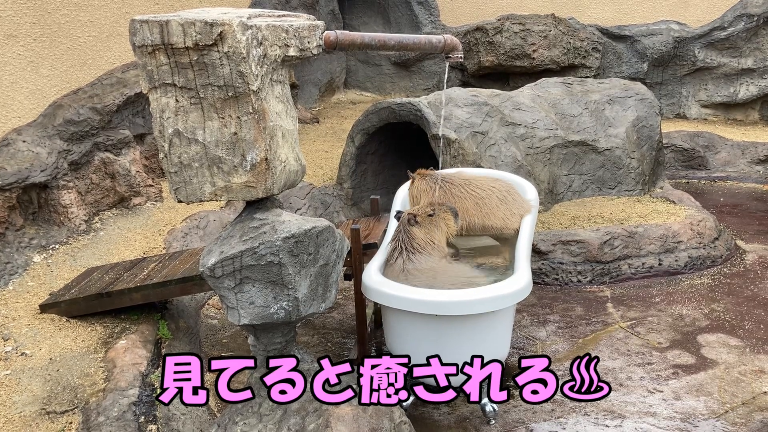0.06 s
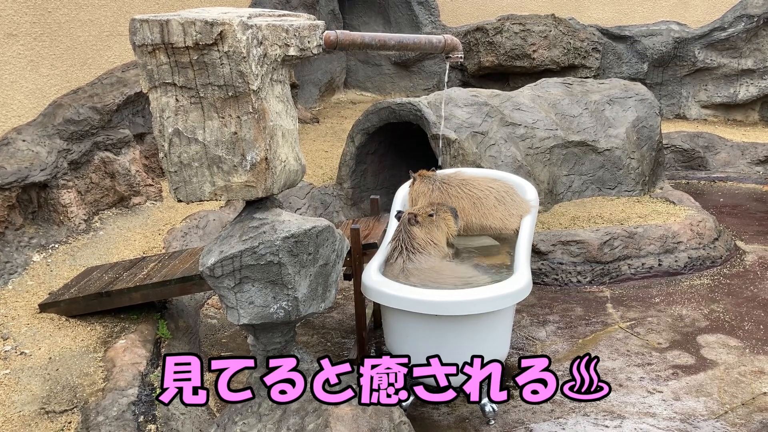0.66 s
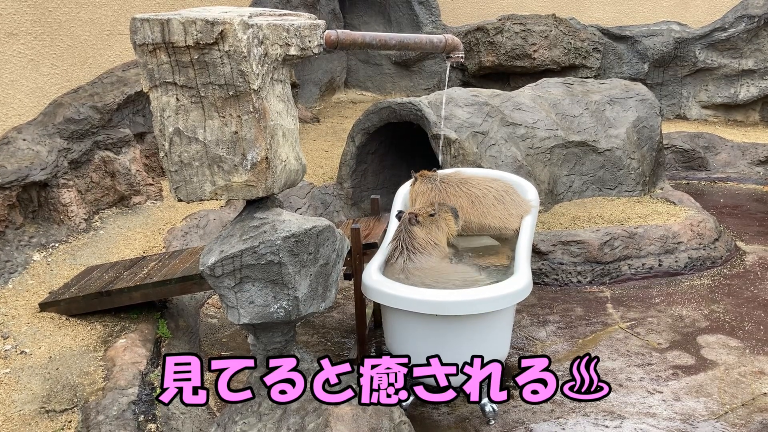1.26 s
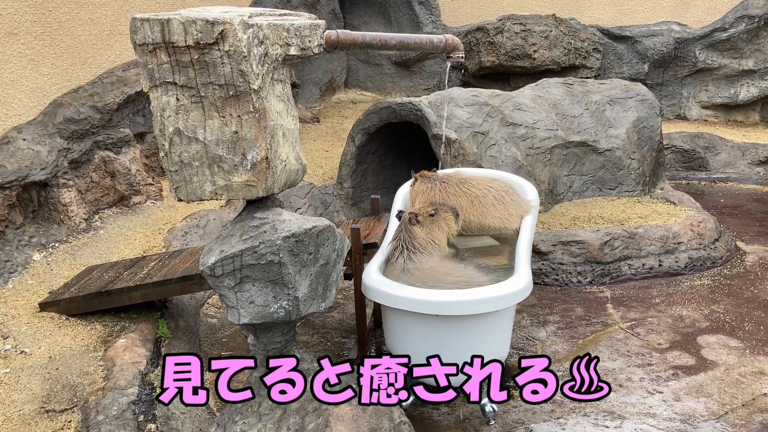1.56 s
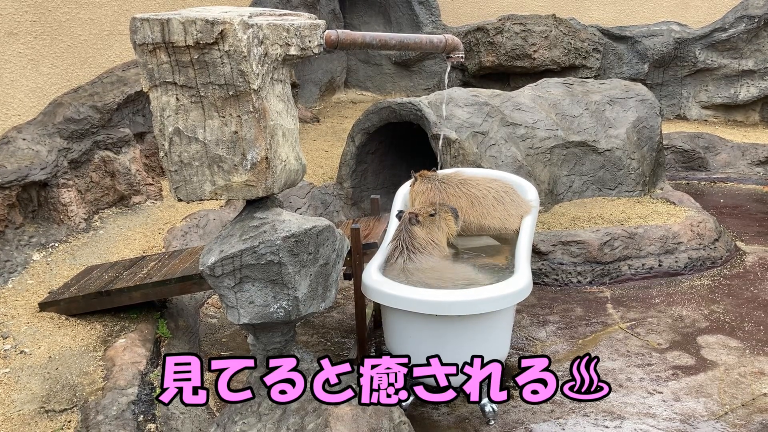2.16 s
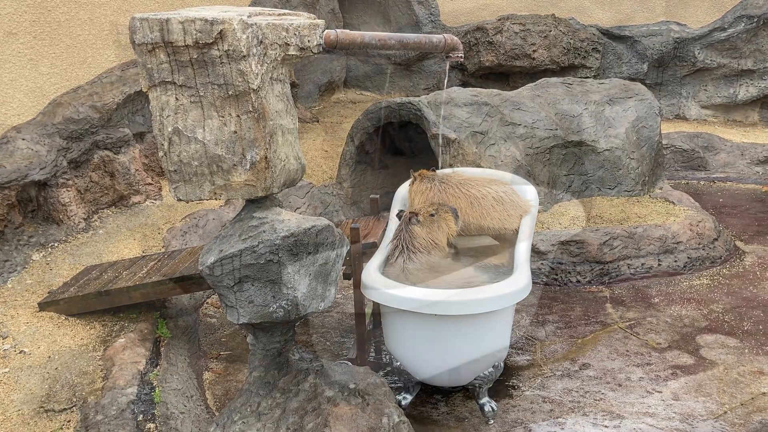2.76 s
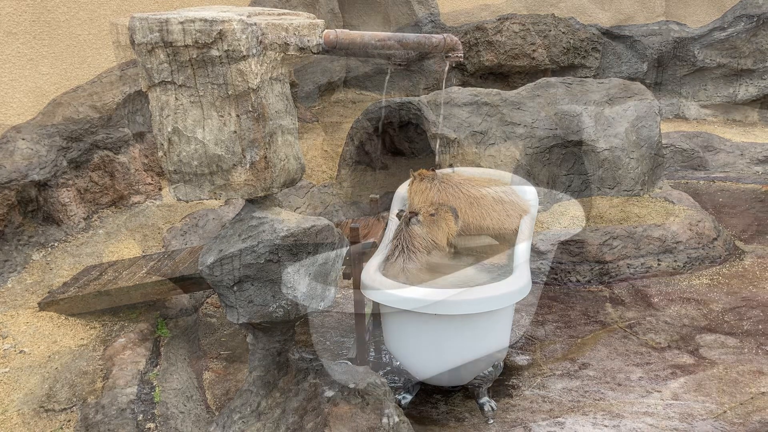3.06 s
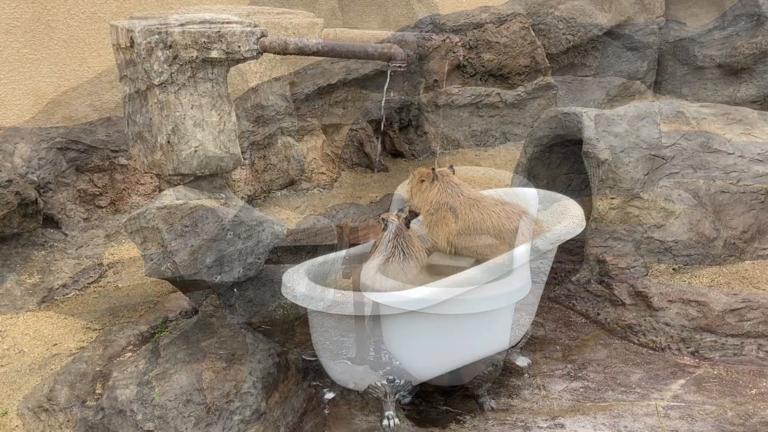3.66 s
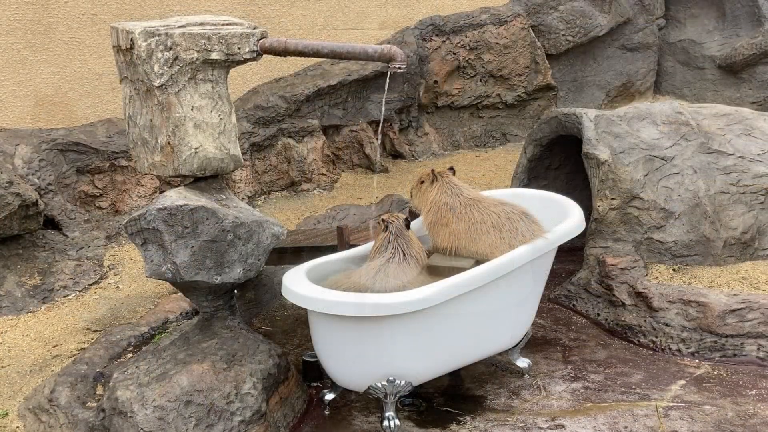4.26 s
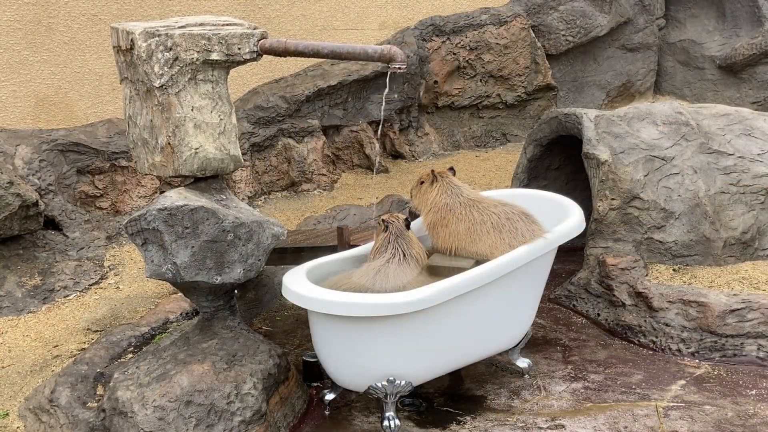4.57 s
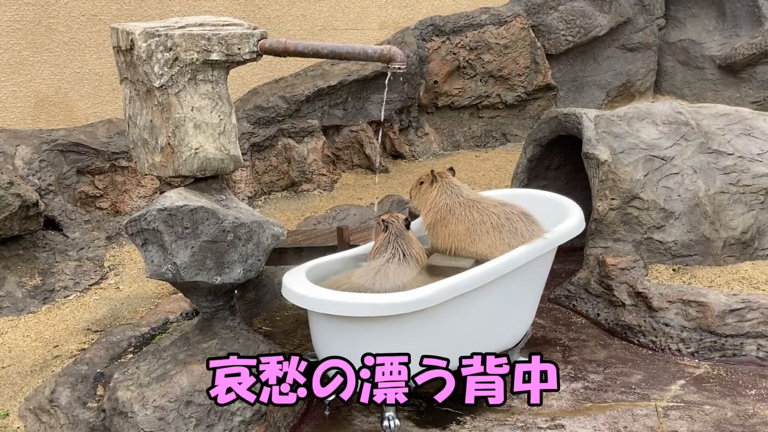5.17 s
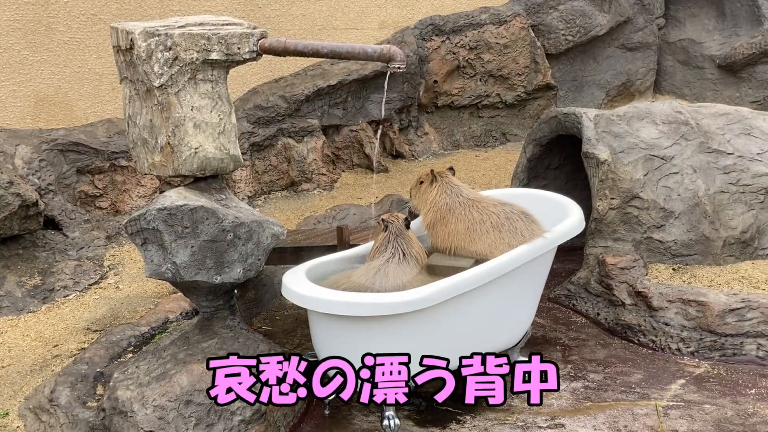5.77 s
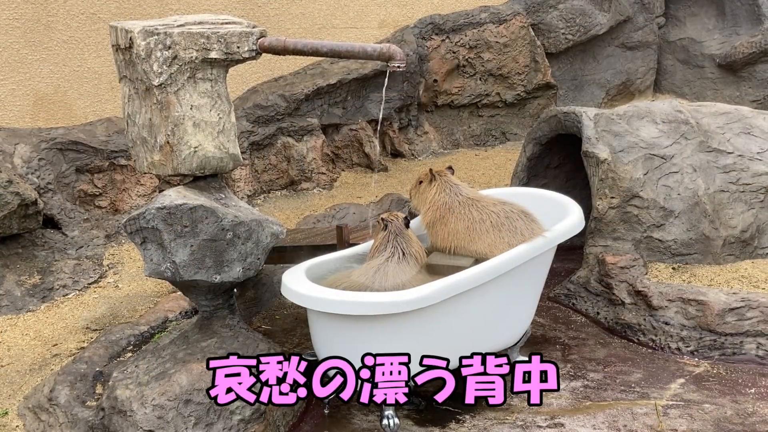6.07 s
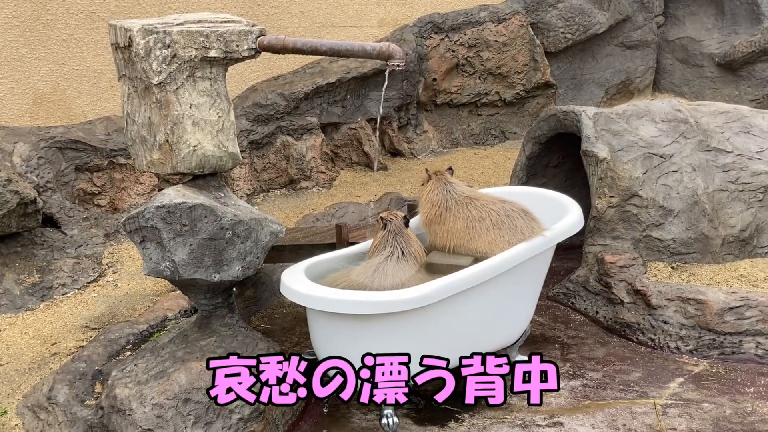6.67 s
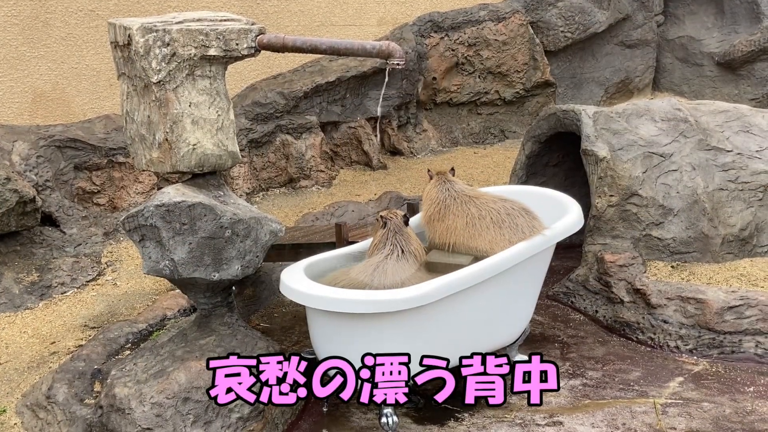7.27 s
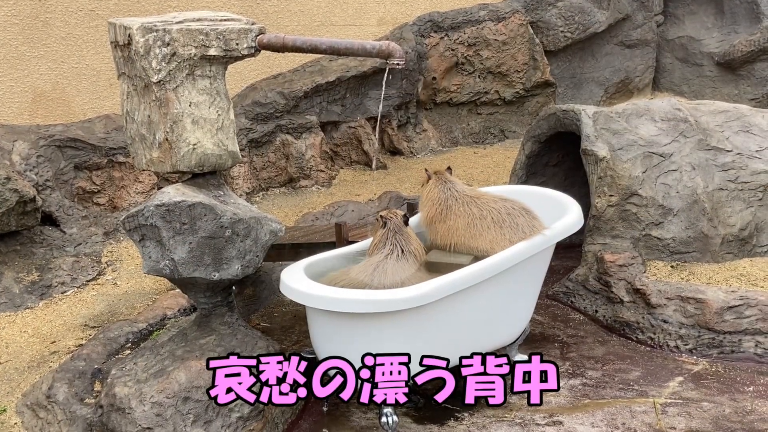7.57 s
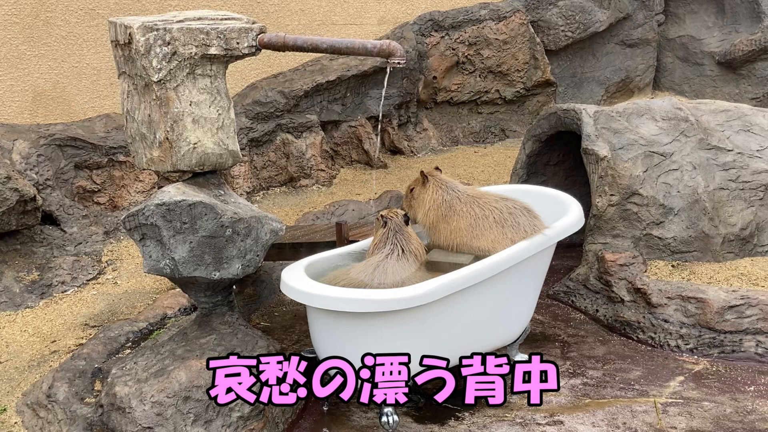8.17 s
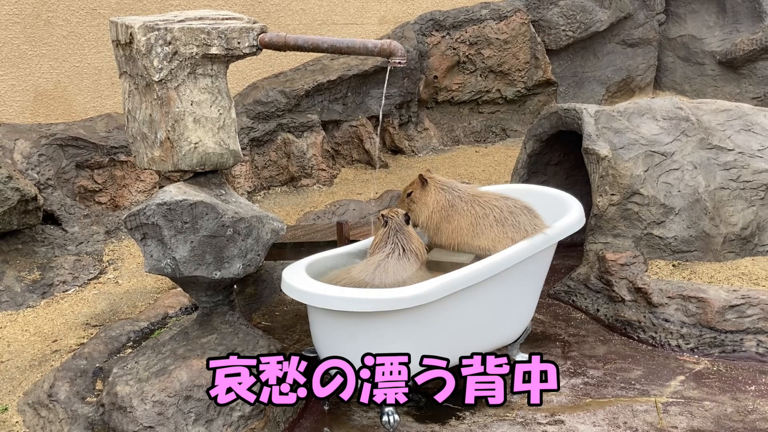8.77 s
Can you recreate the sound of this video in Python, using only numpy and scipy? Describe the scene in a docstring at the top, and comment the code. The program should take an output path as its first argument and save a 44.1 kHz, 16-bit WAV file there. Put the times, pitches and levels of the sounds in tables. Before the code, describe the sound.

A thin stream of water pours from a pipe into a full bathtub for about nine seconds, trickling and bubbling from the very start. Irregular plops and plinks, many rising in pitch, ring out over a dense babble of smaller bubbles. Fine spray fizzes and ticks on the surface, with occasional sharper droplets. Around 2 seconds, and again just before 4, the stream breaks up into brief, brighter splashes, with smaller sloshes between 5 and 6 seconds. Just before 7 seconds it runs smoother and quieter for an instant, then comes one sharp drip, the loudest moment. A couple of quick splashes follow before 8 seconds, and the bubbling carries on evenly to the end. The sound is light, with little bass, and the spray spreads wide in stereo. The tub wall and outdoor rocks return short, faint echoes, over a barely audible hush of air.

```python
"""A thin stream falls from a pipe into a full bathtub in a rocky outdoor enclosure.
From the start it drags air under: big bubbles ring, many rising in pitch as they float up, over a
babble of small ones. Spray ticks on the water, and the tub wall and rocks throw back short echoes.
Around 2 s and again near 4 s the stream breaks up and sloshes. Just before 7 s it briefly runs smooth,
then comes the loudest drip, and the bubbling carries on to the end, near 9 s."""
import sys
import numpy as np
from scipy import signal
from scipy.fft import rfft, irfft, next_fast_len
from scipy.io import wavfile
from scipy.ndimage import uniform_filter1d

SR = 44100
rng = np.random.default_rng(int(sys.argv[2]) if len(sys.argv) > 2 else 0)


def dump_mix(stems):
    """Bounce the given channels to the path in sys.argv[1] as a 16-bit WAV at rate SR."""
    frames = np.atleast_2d(stems).T  # one column per channel
    limited = np.clip(frames, -1, 1)  # hard clip at full scale
    pcm = np.round(limited * 32767).astype(np.int16)
    wavfile.write(sys.argv[1], SR, pcm)


N = 392931


# The loud bubbles: (time [s], starting pitch [Hz], level [dB], ring time [s],
# rise in one ring time [share of the pitch])
LOUD_BUBBLES = [(0.151, 576, -33, 0.045, 0.49), (0.289, 1050, -17, 0.0053, -0.069),
                (0.301, 1110, -27, 0.024, -0.066), (0.34, 400, -31, 0.011, 0.19),
                (0.405, 2180, -13.5, 0.0024, -0.22), (0.411, 604, -15.5, 0.012, 0.85),
                (0.452, 913, -28, 0.04, 0.12), (0.628, 1030, -19, 0.011, 0.18),
                (0.657, 720, -29, 0.0073, -0.27), (0.736, 710, -36, 0.046, 1.16),
                (0.739, 3000, -9, 0.00087, -0.14), (0.74, 1100, -21, 0.004, 0),
                (0.945, 2900, -13, 0.00084, 0.08), (0.946, 1222, -6.5, 0.0093, -0.12),
                (0.96, 1180, -21, 0.0065, -0.2), (0.996, 640, -29, 0.015, -0.061),
                (1.052, 1540, -27, 0.012, 0.28), (1.073, 1252, -22, 0.014, -0.12),
                (1.244, 1320, -23, 0.008, -0.16), (1.257, 2180, -23.5, 0.0056, -0.033),
                (1.306, 438, -41, 0.06, 0.56), (1.425, 1570, -21.5, 0.005, -0.0051),
                (1.455, 1536, -28, 0.016, 0.041), (1.528, 2410, -19, 0.0025, -0.04),
                (1.62, 743, -30.5, 0.047, 0.66), (1.739, 1260, -21.5, 0.013, 0.036),
                (1.801, 3200, -14, 0.0012, -0.024), (1.803, 778, -27.5, 0.023, 0.47),
                (1.861, 1230, -19, 0.0056, 0.028), (1.877, 705, -28, 0.035, 0.33),
                (1.912, 672, -32.5, 0.034, 0.13), (1.955, 700, -26.5, 0.021, 0.13),
                (2.007, 1310, -16.5, 0.0089, -0.07), (2.034, 1086, -26, 0.048, 0.088),
                (2.079, 1010, -21.5, 0.01, -0.0013), (2.183, 1857, -25.5, 0.014, 0.05),
                (2.21, 766, -27.5, 0.026, 0.15), (2.324, 466, -27.0, 0.038, 0.27),
                (2.347, 1860, -17, 0.0051, -0.1), (2.382, 815, -18, 0.027, 0.091),
                (2.384, 970, -12, 0.0033, 0.16), (2.425, 1010, -26.5, 0.04, -0.23),
                (2.451, 2560, -17.5, 0.0039, 0.036), (2.464, 1016, -21, 0.015, 0.48),
                (2.532, 1980, -26, 0.006, 0.085), (2.603, 862, -28.5, 0.029, 0.32),
                (2.809, 992, -22, 0.02, 0.075), (2.817, 1960, -21.5, 0.011, -0.0099),
                (2.839, 1620, -18, 0.0058, -0.02), (2.939, 783, -26, 0.017, 0.18),
                (2.975, 1510, -22, 0.009, 0.02), (3.029, 1980, -16, 0.0042, 0.08),
                (3.03, 1180, -27, 0.017, -0.022), (3.143, 2350, -20, 0.002, -0.45),
                (3.211, 1177, -22, 0.012, -0.15), (3.348, 1980, -25, 0.013, -0.14),
                (3.424, 1870, -19.5, 0.0062, 0.15), (3.46, 460, -39, 0.028, 0.27),
                (3.468, 793, -26.5, 0.0099, 0.1), (3.538, 1050, -25, 0.017, 0.15),
                (3.566, 607, -18.5, 0.0073, -0.12), (3.575, 475, -31, 0.043, 0.1),
                (3.614, 544, -32.5, 0.043, 0.88), (3.706, 3060, -23.5, 0.0045, -0.052),
                (3.72, 780, -28.5, 0.02, -0.097), (3.723, 1620, -23, 0.0061, 0.06),
                (3.762, 665, -26.5, 0.045, 0.85), (3.829, 2885, -19.5, 0.0074, -0.1),
                (3.833, 982, -25, 0.012, 0.17), (3.838, 1910, -24.0, 0.009, 0.08),
                (3.876, 3030, -10, 0.004, -0.068), (3.887, 2070, -15.0, 0.0014, 0.01),
                (3.889, 2880, -24, 0.01, 0.0091), (3.91, 1007, -23.5, 0.02, -0.05),
                (3.918, 1815, -22.5, 0.011, 0.01), (3.955, 617, -38, 0.025, 0.35),
                (3.98, 1160, -18.5, 0.004, 0.22), (4.016, 1705, -18, 0.0069, -0.048),
                (4.077, 2190, -20.5, 0.0052, -0.53), (4.163, 612, -27, 0.016, 0.1),
                (4.166, 876, -25, 0.055, 0.25), (4.169, 402, -32, 0.0051, 0.03),
                (4.358, 1450, -17, 0.0044, -0.33), (4.423, 748, -28, 0.017, 0.13),
                (4.426, 1400, -19.5, 0.0074, -0.0068), (4.502, 887, -18, 0.013, -0.012),
                (4.597, 1030, -27, 0.018, -0.039), (4.656, 617, -30, 0.028, 0.086),
                (4.726, 738, -27.5, 0.031, 0.39), (4.757, 1380, -27.5, 0.024, 0.13),
                (4.811, 2670, -21.5, 0.0041, -0.027), (4.861, 570, -33, 0.03, 0.18),
                (4.951, 1310, -15, 0.0076, -0.17), (4.998, 795, -20, 0.023, 0.24),
                (5.012, 647, -20, 0.023, 0.069), (5.112, 515, -38, 0.051, 0.37),
                (5.243, 1120, -23.5, 0.018, -0.17), (5.259, 561, -31, 0.037, 0.33),
                (5.277, 1800, -38, 0.0077, 0.023), (5.322, 1224, -29, 0.02, 0.77),
                (5.395, 2400, -19, 0.002, -0.16), (5.406, 408, -40.5, 0.074, 0.41),
                (5.435, 641, -34, 0.034, 0.14), (5.504, 1450, -15, 0.0046, 0.028),
                (5.545, 2530, -22, 0.0029, 0.15), (5.565, 936, -24.5, 0.0096, -0.29),
                (5.636, 1043, -22, 0.0094, -0.01), (5.796, 2400, -16, 0.0018, -0.24),
                (5.886, 840, -26, 0.014, 0.24), (5.89, 542, -22.5, 0.031, 1.22),
                (5.904, 1860, -17, 0.0039, -0.055), (5.924, 1114, -23, 0.02, 0.28),
                (5.974, 1210, -28.5, 0.035, 0.2), (6.037, 1810, -22, 0.013, -0),
                (6.112, 770, -31, 0.031, 0.3), (6.162, 368, -35.5, 0.045, 0.59),
                (6.196, 624, -25, 0.022, 0.84), (6.309, 2490, -22, 0.0047, -0.22),
                (6.312, 1080, -26, 0.021, -0.099), (6.32, 416, -33, 0.026, 0.28),
                (6.384, 960, -22.5, 0.02, -0.069), (6.451, 1730, -15.5, 0.0032, -0.08),
                (6.483, 1080, -24.5, 0.012, 0), (6.613, 1250, -18, 0.0075, -0.069),
                (6.618, 657, -21, 0.0099, -0.093), (6.66, 1195, -29, 0.015, -0.043),
                (6.738, 924, -25, 0.029, 0.017), (6.787, 377, -41, 0.049, 0.46),
                (6.791, 1720, -12.0, 0.0034, -0.1), (6.83, 1350, -26, 0.013, 0.042),
                (6.958, 3440, -21.5, 0.0021, -0.03), (6.984, 2230, 4, 0.0014, 0.01),
                (6.987, 2020, -19, 0.0056, -0.03), (7.002, 2710, -40, 0.0041, 0),
                (7.182, 1607, -18, 0.0089, 0.099), (7.24, 426, -37.5, 0.056, 1.03),
                (7.281, 700, -21.5, 0.01, -0.072), (7.296, 930, -17, 0.012, 0.25),
                (7.31, 1190, -22.5, 0.02, -0.095), (7.343, 1900, -17, 0.0031, 0.078),
                (7.357, 1500, -16, 0.0013, -0.05), (7.369, 925, -23, 0.0087, 0.52),
                (7.426, 2420, -18, 0.0029, -0.2), (7.645, 840, -19.5, 0.0069, -0),
                (7.675, 3520, -16.5, 0.00091, -0.13), (7.694, 443, -38.5, 0.036, 0.03),
                (7.805, 1700, -19, 0.0075, -0.26), (7.815, 797, -25.5, 0.024, -0.0094),
                (7.823, 1327, -19.5, 0.017, 0.25), (7.841, 2120, -18.5, 0.0064, -0.18),
                (7.865, 810, -21.5, 0.011, 0.17), (7.978, 902, -25, 0.027, 0.016),
                (8.055, 1780, -29, 0.024, 0.02), (8.056, 1058, -24, 0.04, -0.0029),
                (8.073, 663, -22.5, 0.018, 0.11), (8.163, 1020, -22, 0.013, 0.19),
                (8.222, 997, -24, 0.022, 0.026), (8.312, 1586, -17, 0.007, -0.04),
                (8.45, 2630, -20.5, 0.0032, -0.2), (8.535, 772, -28.5, 0.042, 0.35),
                (8.555, 830, -22, 0.023, -0.024), (8.56, 570, -29.5, 0.019, 0.68),
                (8.597, 498, -42, 0.035, 0.08), (8.701, 1400, -23, 0.015, -0.14),
                (8.717, 3330, -21.0, 0.0021, -0.42), (8.722, 910, -30.5, 0.066, 0.82),
                (8.753, 466, -35, 0.032, -0.065)]

def plops(level_db=-0.57, lowest_hz=320):
    """Trapped air rings in loud plops among softer plinks; so small a source gives off no bass."""
    out = plinks()
    places = rng.uniform(-0.76, 1, len(LOUD_BUBBLES))
    jolts = rng.standard_normal((len(LOUD_BUBBLES), 64, 2))
    for (s, hz, db, ring, rise), place, jolt in zip(LOUD_BUBBLES, places, jolts):
        turn = np.copysign(.25, place) + place / 20  # mostly a time lag between the microphones
        tone = quivering(bubble(hz, max(ring, .001), rise), jolt)
        add(out, s, gain_of(db + level_db) * placed(tone, turn))
    return without_bass(out, lowest_hz, order=3)


def bubble(hz, ring, rise, swell_cycles=0.99, glide_power=1.58, burst=2.2):
    """A pocket of air swells and rings; the faster its pitch climbs, the more suddenly it bursts."""
    t = np.arange(int(2.5 * ring * SR) + 2) / SR
    climb = rise * (t / ring) ** glide_power
    swell = 1 - np.exp(-t * hz / swell_cycles)
    fade = np.exp(-(t / ring) ** (2 + burst * max(rise, 0)))
    boost = np.maximum(1 + climb, 1) ** 0.43  # louder as it nears the surface
    cycles = hz * t * (1 + climb / (1 + glide_power))
    return swell * fade * boost * np.exp(2j * np.pi * cycles)  # complex, so placed() can shift it


def quivering(tone, jolts, depth=.2, jolts_per_s=300, build_s=.008):
    """Churning water squeezes a bubble out of shape, so its level and pitch shake into a glug."""
    t = np.arange(len(tone)) / SR
    shake = np.interp(t * jolts_per_s, np.arange(len(jolts)), jolts[:, 0] + 2j * jolts[:, 1])
    return tone * np.exp(depth * np.tanh(t / build_s) * shake)


def plinks(per_s=12, centre_hz=1350, octaves=1.2, level_db=-28, edge_db=-2, spread_db=0.5, cycles=14):
    """Medium bubbles break off at a loose pace; the longer one rings, the softer it is."""
    out = np.zeros((2, N))
    draws = rng.uniform(-1, 1, (400, 7))[:int(per_s * N / SR)]
    for k, (when, roll_a, roll_b, life, size, climb, turn) in enumerate(draws):
        pitch = (roll_a + roll_b) / 2  # like two dice: middle values come up most
        hz = centre_hz * 2 ** (octaves * pitch)
        stretch = 2 ** life
        ring = cycles * stretch / hz
        strength = gain_of(level_db + edge_db * pitch ** 2 + spread_db * size) / np.sqrt(stretch)
        tone = bubble(hz, ring, pitch_rise(hz, ring) + 0.175 * climb)
        add(out, (k + 1 + when) / per_s, strength * placed(tone, turn))
    return out


def pitch_rise(hz, ring, pivot_hz=997, per_octave=0.224, climb_per_s=4.6, most_sag=0.1):
    """Big bubbles start deep and climb in pitch; small ones at the surface sag a little."""
    return max(per_octave * np.log2(pivot_hz / hz) + climb_per_s * ring, -most_sag)


# The tone colour of the small bubbles: (frequency [Hz], level [dB])
BABBLE_COLOUR = [(40, -48), (150, -39), (380, -26), (500, -16), (650, -3.5), (850, -2), (1120, 2),
                 (1500, -4), (2000, -2), (2800, -15), (4000, -18)]

def babble(surge, stir, level_db=-0.71, surge_db=1.0, lump_db=1.5, gurgle_db=-12, slosh_share=0.58):
    """A cloud of small bubbles rings under the stream, and deeper ones glide up for longer."""
    push = gain_of(surge_db * surge)
    cloud = swarm(457.2, 3965, per_s=470, cycles=10.5, rise=0.16, spread_db=2.5, surge=push)
    gurgle = swarm(520.2, 1300, per_s=36, cycles=28.7, rise=0.358, spread_db=1.3, surge=push)
    bubbles = evened(coloured(cloud + gain_of(gurgle_db) * gurgle, BABBLE_COLOUR))
    return gain_of(level_db + flow() + lump_db * stir + slosh_share * sloshes()) * bubbles


def swarm(low_hz, high_hz, per_s, cycles, rise, spread_db, surge):
    """Many bubbles ring at random times, each with its own size, life and place."""
    out = np.zeros((2, N))
    for when, pitch, life, climb, size, turn in rng.random((9000, 6))[:int(per_s * N / SR)]:
        hz = low_hz * (high_hz / low_hz) ** pitch
        ring = cycles * 3 ** (life - .5) / hz
        extra_db = spread_db * min(-np.log(1 - size), 2.8)  # a few stand out
        strength = np.sqrt(hz / ring) * gain_of(extra_db) * surge[int(when * N)]
        tone = bubble(hz, ring, rise * (1.494 * climb - .4))
        add(out, when * N / SR, strength * placed(tone, turn))
    return evened(out)


# How hard the stream churns the water: (time [s], level [dB])
STREAM_STRENGTH = [(0.0, -37), (0.94, -33.5), (1.31, -35.5), (2.01, -33), (2.58, -35), (4.09, -34),
                   (4.36, -34.5), (5.2, -32), (5.67, -35.5), (6.07, -34), (7.04, -32), (7.21, -35),
                   (7.58, -31.5), (7.91, -33.5), (8.28, -35.5), (8.9, -34.5)]
# Moments when the stream runs smooth: (middle [s], rough half length [s], level change [dB])
SMOOTH_MOMENTS = [(0.56, 0.041, -2), (1.21, 0.025, -4.5), (2.19, 0.068, -3.5), (2.29, 0.021, -4),
                  (2.68, 0.06, -5), (3.08, 0.012, -6), (3.69, 0.042, -5.5), (4.04, 0.044, -6.5),
                  (5.53, 0.064, -3.0), (5.72, 0.042, 0.5), (6.16, 0.06, -3.5), (6.9, 0.073, -7),
                  (7.58, 0.062, -4.5)]

def flow():
    """The stream's strength in dB drifts, and dips where it runs smooth."""
    return np.interp(np.arange(N) / SR, *np.transpose(STREAM_STRENGTH)) + swells(SMOOTH_MOMENTS)


# Moments when the stream breaks up: (middle [s], rough half length [s], extra spray [dB])
SLOSH_MOMENTS = [(1.81, 0.017, 5.5), (2.105, 0.068, 0), (2.436, 0.098, 2), (3.838, 0.013, 8),
                 (3.887, 0.014, 7.5), (5.276, 0.057, 3), (5.943, 0.095, 2), (7.32, 0.014, 5.5),
                 (7.826, 0.037, 6)]

def sloshes():
    """The stream breaks up and showers the surface, adding this many dB."""
    return swells(SLOSH_MOMENTS)


def lumps(attack_s=0.0016, release_s=0.019, strong_db=-13):
    """Each lump of water that traps a loud bubble also stirs the tub, from 0 (not at all) to 1."""
    t = np.arange(0, N, 64) / SR
    s, _, db, _, _ = np.transpose(LOUD_BUBBLES)[:, :, None]
    age = np.maximum(t - s, 0)
    stir = gain_of(db - strong_db) * (1 - np.exp(-age / attack_s)) * np.exp(-age / release_s)
    return np.interp(np.arange(N) / SR, t, np.tanh(stir.sum(0)))


# The tone colour of the spray: (frequency [Hz], level [dB])
SPRAY_COLOUR = [(1500, 16.5), (3000, 4), (4200, -0.5), (5700, 2), (6700, 1.5), (8000, -4), (11000, -2.5),
                (13500, -3.5), (16000, -11)]

def spray(surge, stir, level_db=-38, fizz_db=-8, patter_db=-4.5, mist_db=-6, lump_db=3, flow_share=0.42):
    """Tiny bubbles fizz and droplets crackle on the water, over a fine mist."""
    clumps = gain_of(0.93 * surge + 1.93 * wander(per_s=160))
    fizz = swarm(2668, 11520, per_s=720, cycles=11, rise=0.068, spread_db=4, surge=clumps)
    ticks = patter(clumps)
    mist = evened(clumps * rng.standard_normal((2, N)))
    splash = without_bass(gain_of(patter_db) * ticks + gain_of(mist_db) * mist, hz=1400)
    level = level_db + flow_share * (flow() - flow().mean()) + lump_db * stir + sloshes()
    return gain_of(level) * coloured(gain_of(fizz_db) * fizz + splash, SPRAY_COLOUR)


def patter(clumps, ticks_per_s=1100, shower_db=4, spread_db=4, tick_s=0.00041):
    """Droplets land in brief showers; each tick starts at once and dies in about a millisecond."""
    rate = ticks_per_s * gain_of(shower_db * wander(per_s=60))
    lands = rng.random(N) < rate / SR
    hits = lands * gain_of(spread_db * np.minimum(rng.exponential(1, N), 3.4)) * clumps
    power = signal.lfilter([1], [1, -np.exp(-2 / (tick_s * SR))], hits ** 2)
    return evened(np.sqrt(power) * rng.standard_normal((2, N)))


# Big drops of spray: (time [s], pitch [Hz], pitch spread [octaves], level [dB], left minus right [dB])
BIG_DROPS = [(0.739, 4500, .6, -21, 0), (0.945, 3300, 0.55, -20.5, 12), (1.451, 11000, .45, -17.5, -3),
             (1.8, 4760, 0.28, -14.5, 12), (2.078, 10000, 0.55, -27, 0), (2.08, 3500, 0.62, -18, 3),
             (2.455, 8100, 0.17, -18, -3), (2.816, 11000, .3, -18.5, -4), (3.096, 5500, 0.36, -23.5, -23.5),
             (3.246, 5500, .5, -17.5, 0), (3.831, 3100, .4, -13, 1), (3.833, 9000, .6, -16, 5),
             (3.877, 8000, .5, -16.5, 6), (4.947, 9900, 0.39, -22, 2), (6.386, 5400, 0.44, -18, 1),
             (6.451, 3300, 0.78, -17, -3), (6.612, 7000, 0.63, -23, -3), (6.984, 4800, 0.57, -21, 0),
             (7.317, 14100, .2, -27, 2), (7.326, 8000, .6, -29, 1), (7.426, 13500, .3, -20, 2),
             (7.507, 13800, .25, -21.5, 2), (7.804, 3500, 0.64, -18, -3), (7.817, 4500, 0.68, -23, -2),
             (8.098, 8000, 0.48, -23, -2), (8.894, 6850, .2, -17.5, 0)]

def drops(level_db=-2, attack_s=0.00014, decay_s=0.0011, hiss_db=-24, scatter_db=-13, scatter_s=0.0056):
    """Each big drop slaps the surface near its own pitch and scatters into a brief crackle."""
    out, size = np.zeros((2, N)), 1024
    t, hz = np.arange(size) / SR, np.fft.rfftfreq(size, 1 / SR)
    for s, centre, octaves, db, pan in BIG_DROPS:
        noise = rng.standard_normal((3, size))
        colour = np.exp(-.5 * (np.log2((hz + 1) / centre) / octaves) ** 2) + gain_of(hiss_db)
        crackle = evened(uniform_filter1d(noise[2], size=30) ** 2)
        scatter = gain_of(scatter_db) * crackle * np.exp(-t / scatter_s)
        shape = (1 - np.exp(-t / attack_s)) * (np.exp(-t / decay_s) + scatter)
        slap = evened(irfft(rfft(noise[:2]) * colour)) * shape
        add(out, s, gain_of(db + level_db) * slap * gain_of([[pan / 2], [-pan / 2]]))
    return without_bass(out, hz=1500)


# Tiny bubbles at the surface: (time [s], pitch [Hz], level [dB], left minus right [dB])
TINY_BUBBLES = [(0.457, 5860, -17, 1), (0.995, 5300, -19, 8), (1.366, 5700, -16, -5),
                (2.077, 6000, -12.5, 2), (2.372, 4400, -13.5, -1), (2.521, 5830, -9, -4),
                (3.647, 9050, -21, 11), (3.877, 5360, -12.5, 8), (4.476, 6300, -20.5, 14),
                (6.386, 5400, -14.5, 3), (6.459, 5540, -21, -6), (6.651, 5940, -16, 7),
                (6.735, 5350, -16.5, -1), (7.208, 8100, -18, 12), (7.305, 6740, -18, 0),
                (7.325, 5600, -20, 1), (7.446, 5520, -14.5, 5), (7.804, 6000, -22, -5)]

def pings(ring_s=0.0021, rise=0.03, lag_s=0.000055):
    """A tiny bubble rings very briefly; its sound reaches one microphone just before the other."""
    out = np.zeros((2, N))
    for s, hz, db, pan in TINY_BUBBLES:
        turn = hz * lag_s * np.copysign(1, -pan)
        tone = placed(bubble(hz, ring_s, rise, swell_cycles=5), turn)
        add(out, s, gain_of(db) * tone * gain_of([[pan / 2], [-pan / 2]]))
    return out


# A deep plop and a dull, low thump: (time [s], pitch [Hz], level [dB], ring time [s])
PLOP_AND_THUMP = [(3.851, 310, -32, .0065), (4.166, 85, -52, .03)]

def plop_and_thump():
    """A deep plop and a dull, low thump ring briefly, each holding its pitch."""
    out = np.zeros((2, N))
    for s, hz, db, ring in PLOP_AND_THUMP:
        add(out, s, gain_of(db) * placed(bubble(hz, ring, rise=0), turn=.25))
    return out


# How long the rocks echo: (frequency [Hz], time to fade by 60 dB [s])
ROCK_FADE = [(200, 0.56), (1000, 0.33), (4000, 0.019), (14000, 0.2)]

def echo_paths(tub_db=-12, tub_s=0.0096, rocks_db=-18, echoes_per_s=3000):
    """Quick echoes come off the tub wall, then a faint tail from the rocks; each side has its own."""
    size = SR // 3
    t = np.arange(size) / SR
    tub, rocks = rng.choice([-1., 1.], (2, 2, size)) * (rng.random((2, 2, size)) < echoes_per_s / SR)
    tub = tub * (t > .002) * np.exp(-t / tub_s)
    hz, age, bands = signal.stft(rocks * (t > .014), SR, nperseg=256)
    fade = gain_of(-60 * age / look_up(ROCK_FADE, hz)[:, None])
    rocks = signal.istft(bands * fade, SR, nperseg=256)[1][:, :size]
    return (gain_of(tub_db) * evened(tub) + gain_of(rocks_db) * evened(rocks)) / np.sqrt(size)


def moving_echoes(sound, pieces=16):
    """The splash moves about on the water, so its echo paths keep changing."""
    out, hop = np.zeros((2, N)), N // pieces
    padded = np.pad(sound, [(0, 0), (hop, 2 * hop)])
    window = signal.windows.cosine(2 * hop)
    for k in range(pieces + 1):
        piece = padded[:, k * hop:(k + 2) * hop] * window
        echo = signal.fftconvolve(piece, echo_paths(), axes=1)
        add(out, max(k - 1, 0) * hop / SR, echo if k else echo[:, hop:])
    return out


# The tone colour of the still air: (frequency [Hz], level [dB])
AIR_COLOUR = [(20, -49), (60, -31), (120, 2), (200, 10.5), (320, 9.5), (500, 14.5), (1000, -15),
              (4000, 0.5)]

def still_air(level_db=-56):
    """A faint, steady hush lies behind the water."""
    return gain_of(level_db) * evened(coloured(rng.standard_normal((2, N)), AIR_COLOUR))


def gain_of(db):
    """Turns decibels into a number to multiply by."""
    return 10 ** (np.asarray(db) / 20)


def evened(x):
    """Scales a signal to an average size (rms) of 1."""
    return x / np.sqrt(np.mean(x ** 2) + 1e-20)


def look_up(table, hz):
    """Reads between the rows of a (frequency, value) table, with octaves evenly spaced."""
    row_hz, value = np.transpose(table)
    return np.interp(np.log(hz + 1), np.log(row_hz + 1), value)


def coloured(x, table):
    """Turns each frequency up or down as a table says."""
    size = next_fast_len(N, True)
    gain = gain_of(look_up(table, np.fft.rfftfreq(size, 1 / SR)))
    return irfft(rfft(x, size) * gain, size)[..., :N]


def without_bass(x, hz, order=2):
    """Turns down everything below hz."""
    return signal.sosfilt(signal.butter(order, hz, "high", fs=SR, output="sos"), x)


def add(mix, s, sound):
    """Mixes a two-channel sound in at time s."""
    part = mix[:, max(round(s * SR), 0):][:, :sound.shape[1]]
    part += sound[:, :part.shape[1]]


def placed(tone, turn):
    """Two channels of a tone; its place in the tub shifts one by part of a cycle (turn)."""
    return np.array([tone.real, (tone * np.exp(2j * np.pi * turn)).real])


def wander(per_s):
    """A random drift that takes a new value per_s times a second."""
    steps = np.arange(N) / SR * per_s
    return evened(np.interp(steps, np.arange(8192), rng.standard_normal(8192)))


def swells(table):
    """One smooth hump or dip in dB for each row of a table."""
    t = np.arange(N) / SR
    return sum(db * np.maximum(1 - ((t - s) / length) ** 2 / 2, 0) ** 2 for s, length, db in table)


# Stereo width; high sounds differ more between the microphones: (frequency [Hz], side level [dB])
STEREO_WIDTH = [(60, -7.5), (500, -11.5), (1150, -10.5), (1900, -7.5), (2800, -0.5), (4200, 4), (6300, 2.5),
                (8000, 0.5), (15000, .5)]

def scene():
    """Bubbles and spray surge together as the stream breaks into lumps."""
    surge, stir = wander(per_s=45), lumps()
    water = plops() + plop_and_thump() + babble(surge, stir) + spray(surge, stir)
    mid, side = water + still_air() + moving_echoes(water)  # mid is what left and right share
    side = coloured(side, STEREO_WIDTH)
    slaps = drops() + pings()
    slaps = slaps + signal.oaconvolve(slaps, echo_paths(), axes=1)[:, :N]
    return np.array([mid + side, mid - side]) + slaps


def record(dry, bright_db=0.75, ceiling=.88, highest_hz=15950):
    """The left microphone is a little brighter, the loudest drip overloads softly, the top is cut."""
    left = coloured(dry[0], [(2500, 0.018), (12000, bright_db)])
    right = coloured(dry[1], [(2500, 0.015), (12000, -bright_db)])
    both = np.array([left, right])
    overload = both / (1 + (both / ceiling) ** 8) ** (1 / 8) - both
    bass_cut = signal.butter(2, 700, "high", fs=SR, output="sos")
    both = both + signal.sosfiltfilt(bass_cut, overload)
    top_cut = signal.firwin(511, highest_hz, window=("kaiser", 9), fs=SR)
    return signal.oaconvolve(both, top_cut[None], "same", axes=1)


dry = scene()
out = record(dry)
dump_mix(out)
```